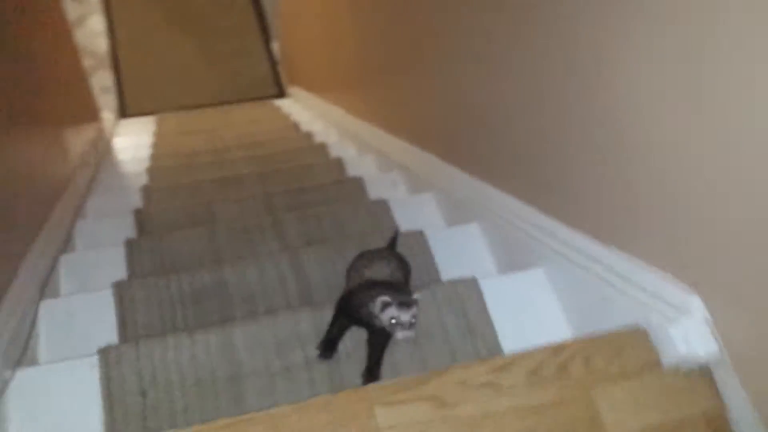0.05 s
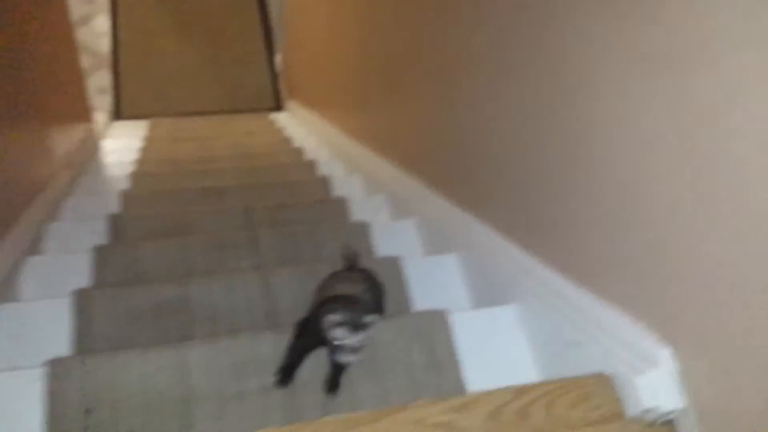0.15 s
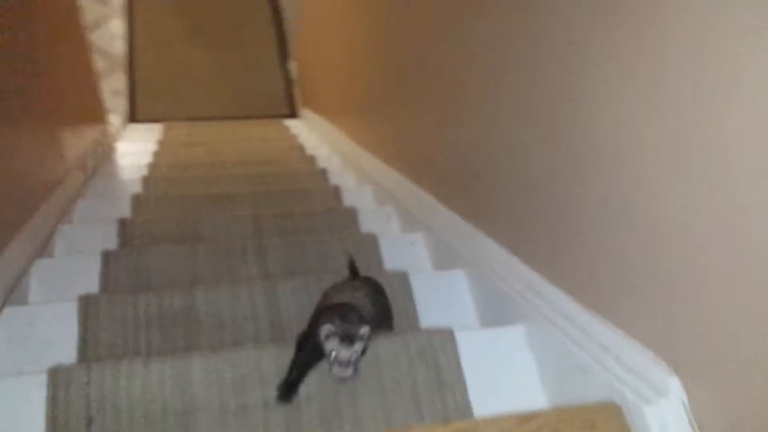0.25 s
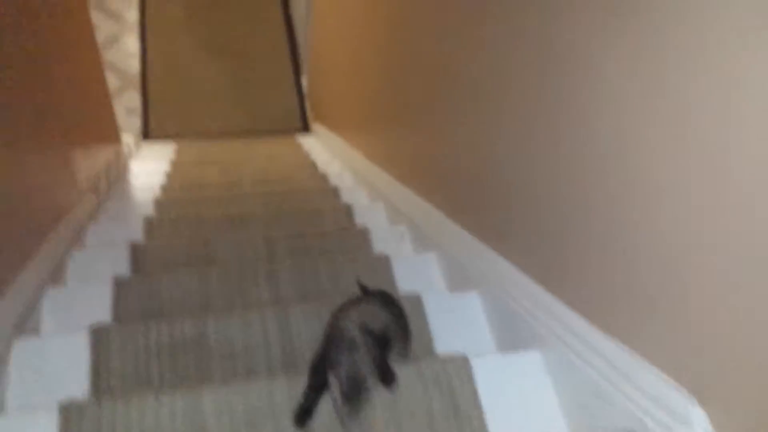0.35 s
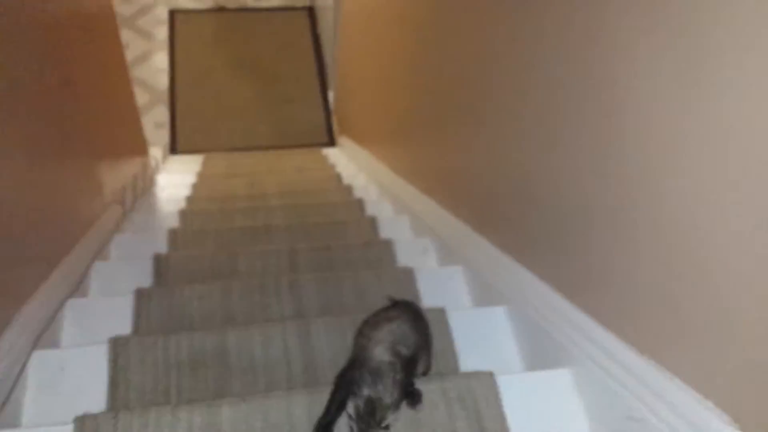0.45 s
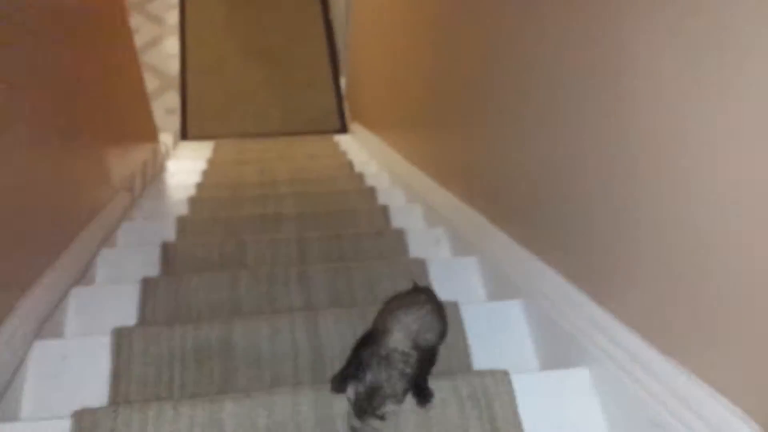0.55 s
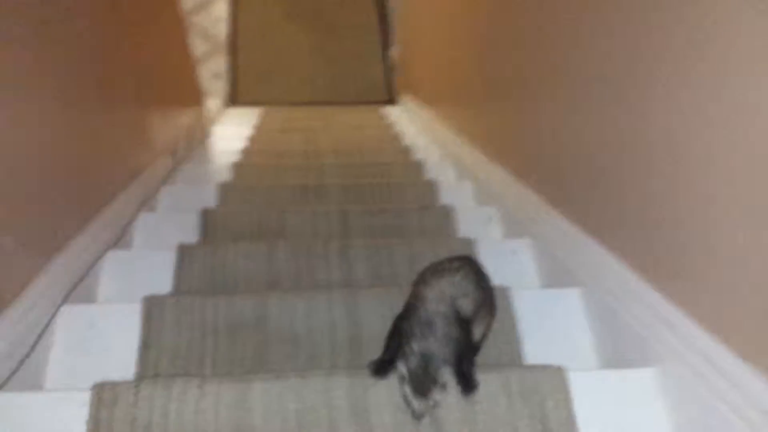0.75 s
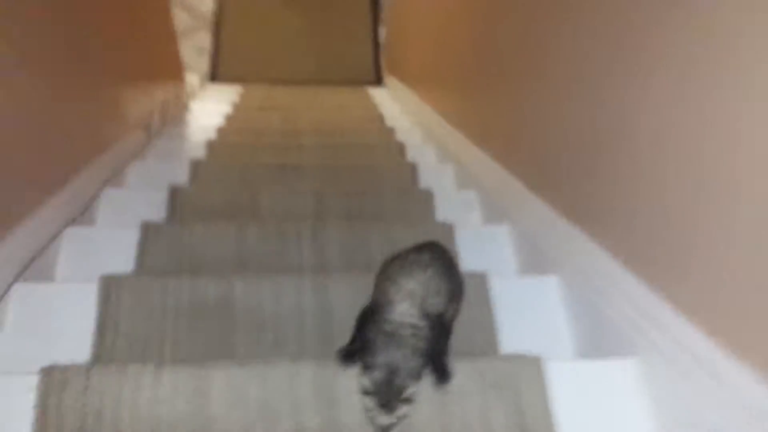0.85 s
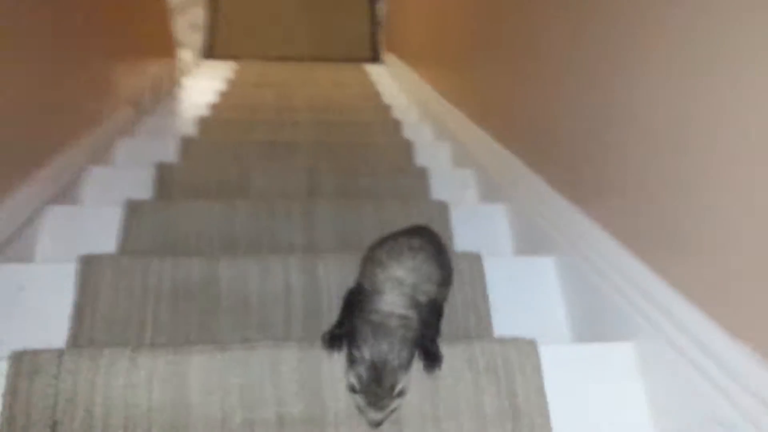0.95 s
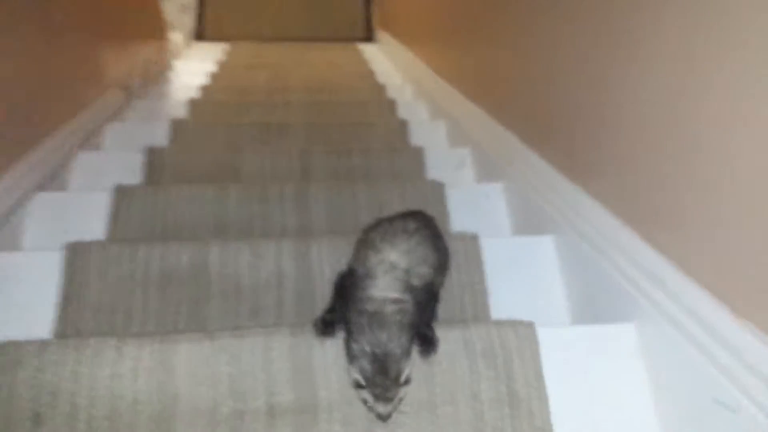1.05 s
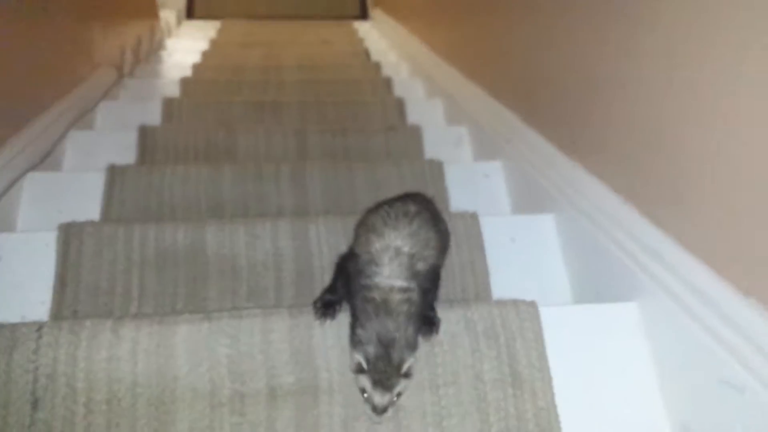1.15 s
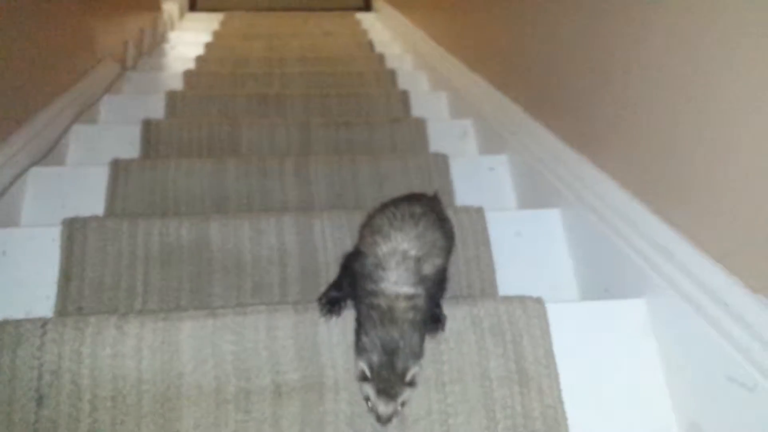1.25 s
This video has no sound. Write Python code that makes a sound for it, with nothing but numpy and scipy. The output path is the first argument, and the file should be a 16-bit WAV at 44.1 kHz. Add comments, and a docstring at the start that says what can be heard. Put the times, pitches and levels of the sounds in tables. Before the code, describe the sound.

A ferret's paws thump and scuff on carpeted stairs, with small claw ticks and brushing fur. Two hard wooden knocks sound in the stairwell, followed by close finger bumps on the left of the hand-held microphone, over faint hiss.

```python
"""A hard knock rings in a stairwell, then a ferret hops up the carpeted wooden stairs towards a
hand-held camera. Its paws thump the treads and scuff the carpet; claws tick and fur brushes the pile.
A second knock midway also sets the staircase ringing, and fingers bump the camera's left side.
The right microphone hears most of the treble, over a low room rumble and faint hiss."""
import sys
import numpy as np
from scipy import signal
from scipy.fft import rfft, irfft, next_fast_len
from scipy.io import wavfile

SR = 44100
rng = np.random.default_rng(int(sys.argv[2]) if len(sys.argv) > 2 else 0)


def waveform_to_disk(signal):
    """Save audio, clipped to [-1, 1], as 16-bit WAV at the path in sys.argv[1]."""
    frames = np.transpose(np.atleast_2d(signal))
    scaled = np.clip(frames, -1, 1) * 32767
    samples = np.round(scaled).astype(np.int16)
    wavfile.write(sys.argv[1], SR, samples)


N = 57330

# Spectra of the sources: f/Hz, relative level/dB per Hz
RUMBLE_SPECTRUM = [(20, -7.5), (55, 2), (120, -3.5), (230, -16.5), (500, -24.5), (1500, -34.5),
                   (4000, -39.5), (14000, -53)]  # room and handling
HISS_SPECTRUM = [(200, 12.5), (1500, 4.5), (4000, -2.5), (9000, -0.5), (12000, -2), (14500, -6)]  # microphone noise
BUMP_SPECTRUM = [(40, 0), (350, 5), (800, -8), (2000, -20), (5000, -51), (14000, -45)]  # finger on the case
CLACK_SPECTRUM = [(60, -10), (250, 6), (550, 6.5), (900, 1.5), (1250, 8), (1800, -10), (3000, -14),
                  (6000, -25), (14000, -67)]  # blow on wood
SHUDDER_SPECTRUM = [(40, -7), (130, 0.5), (230, 0), (400, 4.5), (700, -8), (1200, -4), (2000, -13.5),
                    (4000, -25), (14000, -56)]  # the wood after the blow
BRUSH_SPECTRUM = [(80, 6), (300, 13), (800, 9), (1500, 0), (3000, -2), (5000, -3.5), (8000, -4),
                  (11000, -6.5), (14500, -18)]  # fur on carpet
TICK_SPECTRUM = [(500, -5), (2500, -13), (3700, 0), (4700, 7.5), (6000, 0.5), (7700, 3), (9500, -11),
                 (12500, -1.5), (14500, -12)]  # claw tip
PAT_SPECTRUM = [(60, -19), (200, 3), (380, -2), (650, -3), (930, -1.5), (1250, -18), (1600, -12),
                (2000, -23.5), (6000, -38), (14000, -47)]  # board under the carpet
SCUFF_SPECTRUM = [(60, -13), (250, -4), (600, -3.5), (1300, -1), (2300, -1.5), (3000, 3), (3700, 0.5),
                  (5000, -1), (6200, -3), (8000, -1), (11000, -5.5), (12500, -14), (14500, -24)]  # paw in the pile
SCRATCH_SPECTRUM = [(300, -44), (1800, -11), (2450, -8), (2700, -4.5), (2980, 3), (3400, -9), (3900, -12.5),
                    (4500, -11.5), (7000, -23), (14000, -55)]  # claws in the weave
# Course of the background: t/s, level/dB
RUMBLE_LEVELS = [(.02, -38), (.12, -56), (.4, -42), (.62, -55), (.8, -49.5), (.98, -61), (1.1, -48.5),
                 (1.3, -63.5)]
HISS_LEVELS = [(0, -57.5), (.45, -58.5), (.6, -59.5), (.92, -57.5), (.98, -62), (1.08, -61), (1.3, -65)]
# Finger bumps, claw ticks and thin metallic rings: t/s, level/dB
FINGER_BUMPS = [(.308, -23), (.929, -9.5), (1.030, -13.5)]
CLAW_TICKS = [(.379, -34.5), (.4535, -29), (.4895, -30), (.5415, -29.5), (.691, -33), (1.012, -42),
              (1.019, -28), (1.227, -42.5), (1.283, -43)]
CLAW_PINGS = [(1.019, -42), (1.283, -54.5)]
# Knocks in the stairwell: t/s, clack/dB, shudder/dB
WOOD_KNOCKS = [(.018, -8, -35), (0.7613, -7.5, -35)]
# Body brushing the carpet: centre t/s, length/s, level/dB
FUR_BRUSHES = [(0.0, 0.091, -41.5), (0.166, 0.031, -43.5), (0.238, 0.097, -46), (0.386, 0.096, -49.5),
               (0.479, 0.022, -44), (0.66, 0.14, -50), (0.798, 0.077, -47.5), (0.901, 0.049, -52),
               (.99, 0.043, -60), (1.09, 0.034, -52), (1.223, 0.17, -63)]
# Tread thumps: paw landings, plus the staircase ringing from the second knock (the 0.761 s row):
# t/s, thump/dB, tread f/Hz, swell/s, ring/dB, pat/dB, scuff/dB, scuff t60/s, scratch/dB
TREAD_THUMPS = [(0.1733, -12.5, 95.2, 0.013, -18.5, -31, -32, 0.2, -31),
                (0.245, -29.5, 96, 0.008, -26, -46, -44.5, 0.17, -59),
                (0.339, -54, 99, 0.0062, -45, -38, -46, 0.06, -68),
                (0.352, -23, 100.4, 0.018, -24.5, -57, -42.5, .25, -51),
                (0.386, -37, 90.5, 0.011, -28, -76, -55, 0.12, -63),
                (0.41, -23.5, 79, 0.0163, -41, -41, -53, 0.29, -59),
                (0.452, -31, 104.8, 0.021, -26, -66, -43.5, 0.26, -41.5),
                (0.691, -25, 115.5, 0.015, -17.5, -35.5, -36, 0.14, -29.5),
                (0.761, -35, 90.5, 0.015, -24.5, -63, -60, .1, -68),
                (.879, -41, 107.6, 0.016, -50, -77, -42, 0.088, -64),
                (1.011, -29.5, 75.8, 0.015, -25, -59, -38.5, 0.14, -43),
                (1.061, -35.5, 83.2, 0.017, -28.5, -45, -52, 0.051, -67)]
# Resonances of the staircase: f/Hz, relative level/dB, t60/s
STAIR_RESONANCES = [(69.4, -15.5, 0.47), (83.76, -14.5, 0.26), (126.1, -10.5, 0.21), (170, -17, 0.16),
                    (194.6, -21.5, 0.42), (228.3, -22, 0.41), (264, -18, 0.16), (352, -25, 0.58),
                    (528.6, -21, 0.17)]
# Reverberation of the stairwell: f/Hz, t60/s
STAIRWELL_DECAY = [(100, 0.13), (400, 0.51), (1500, 0.32), (5000, 0.33), (12000, 0.37)]
# Left microphone against the right: f/Hz, level/dB
LEFT_MIC_RESPONSE = [(100, 0.5), (250, -0.5), (500, -5), (1200, -12), (3000, -14.5), (5000, -39),
                     (8000, -45), (14000, -10)]


def amp(db):
    """Decibels to gain."""
    return 10 ** (np.asarray(db) / 20)


def unit(x):
    """Scaled to rms 1."""
    return x / np.sqrt(np.mean(x ** 2) + 1e-20)


def along(points, hz):
    """Interpolate (f/Hz, value) points on a log frequency axis."""
    freqs, values = np.transpose(points)
    return np.interp(np.log(hz + 1), np.log(freqs + 1), values)


def since(s):
    """Seconds since a moment, zero before it."""
    return np.maximum(np.arange(N) / SR - s, 0)


def level(points):
    """Gain per sample from (t/s, level/dB) points."""
    return amp(np.interp(since(0), *np.transpose(points)))


def strike(s, attack_s, t60_s):
    """An envelope that rises quickly and dies away."""
    return (1 - np.exp(-since(s) / attack_s)) * amp(-60 * since(s) / t60_s)


def clicks(rows):
    """One sharp push for each (t/s, level/dB) row."""
    out = np.zeros(N)
    for s, db in rows:
        out[int(s * SR)] += amp(db)
    return out


def colour(x, points, keep_power=True):
    """Minimum-phase filter shaped by (f/Hz, level/dB); keep_power holds white noise at its power."""
    size = next_fast_len(2 * N)
    gain = amp(along(points, np.fft.rfftfreq(size, 1 / SR)))
    cepstrum = irfft(np.log(unit(gain) if keep_power else gain), size)
    cepstrum[1:size // 2] *= 2
    cepstrum[size // 2 + 1:] = 0
    return irfft(rfft(x, size) * np.exp(rfft(cepstrum)), size)[..., :N]


def grainy(depth_db):
    """Noise whose strength jumps each millisecond, as fibres catch and slip."""
    knots = rng.standard_normal(N // 44 + 2)
    flicker = np.interp(np.linspace(0, len(knots) - 1, N), np.arange(len(knots)), knots)
    return unit(rng.standard_normal(N) * amp(depth_db * flicker))


def stairwell(x, wet_db):
    """Direct sound plus a diffuse tail at each microphone."""
    hz, t, noise = signal.stft(rng.standard_normal((2, SR // 2)), SR, nperseg=256)
    decay = amp(-60 * t / along(STAIRWELL_DECAY, hz)[:, None])
    tail = signal.istft(noise * decay, SR, nperseg=256)[1]
    tail = np.pad(tail, ((0, 0), (150, 0)))  # 3.4 ms behind the direct sound
    tail /= np.linalg.norm(tail[0])
    return x + amp(wet_db) * signal.fftconvolve(x[None], tail, axes=1)[:, :N]


def room_tone(side_db=-8.5):
    """Room and handling rumble that settles as the camera steadies, and microphone hiss."""
    mid, side = colour(rng.standard_normal((2, N)), RUMBLE_SPECTRUM)
    side *= amp(side_db)
    rumble = level(RUMBLE_LEVELS) * np.array([mid + side, mid - side])
    hiss = level(HISS_LEVELS) * colour(rng.standard_normal((2, N)), HISS_SPECTRUM)
    return rumble + hiss


def finger_bumps(right_db=-29):
    """Fingers on the camera's left side, heard close and dry through the case."""
    return colour(clicks(FINGER_BUMPS), BUMP_SPECTRUM) * amp([[0], [right_db]])


def knocks(rebound_s=0.00118, rebound_db=-1):
    """Out in the stairwell, a clack with an instant rebound, then the struck wood's duller shudder."""
    blows = sum(clicks([(s, db), (s + rebound_s, db + rebound_db)]) for s, db, _ in WOOD_KNOCKS)
    clack = colour(blows, CLACK_SPECTRUM)
    envelope = sum(amp(db) * strike(s, attack_s=0.0018, t60_s=0.16) for s, _, db in WOOD_KNOCKS)
    shudder = colour(envelope * grainy(depth_db=4), SHUDDER_SPECTRUM)
    return stairwell(clack + shudder, wet_db=-3)


def fur_brushes():
    """Belly and tail drag softly over the carpet between hops."""
    envelope = sum(amp(db) * np.exp(-2 * ((since(0) - s) / length) ** 2) for s, length, db in FUR_BRUSHES)
    return stairwell(colour(envelope * grainy(depth_db=1), BRUSH_SPECTRUM), wet_db=0.5)


def claw_ticks(ping_hz=8020, flutter_hz=60.6):
    """Claws tick sharply on the stairs, twice with a thin fluttering ring."""
    ticks = np.zeros(N)
    for s, db in CLAW_TICKS:
        envelope = strike(s, attack_s=0.00009, t60_s=0.007)
        burst = envelope * rng.standard_normal(N)
        ticks += amp(db) * burst * np.linalg.norm(envelope) / np.linalg.norm(burst)
    drift = np.cumsum(rng.standard_normal(N)) * np.sqrt(2 * np.pi * flutter_hz / SR)
    pings = np.zeros(N)
    for s, db in CLAW_PINGS:
        tone = np.sin(2 * np.pi * ping_hz * since(s) + drift)
        pings += amp(db) * strike(s, attack_s=0.0012, t60_s=0.2) * tone
    return stairwell(colour(ticks, TICK_SPECTRUM) + pings, wet_db=-5)


def paw_scuffs(attack_s=0.0025, grain_db=2.5):
    """Pads pat the board and bite into the pile while claws rake the weave."""
    pat, scuff, scratch = np.zeros((3, N))
    for s, *_, pat_db, scuff_db, scuff_t60_s, scratch_db in TREAD_THUMPS:
        pat += amp(pat_db) * strike(s, attack_s, t60_s=0.13)
        scuff += amp(scuff_db) * strike(s, attack_s, scuff_t60_s)
        scratch += amp(scratch_db) * strike(s, attack_s, t60_s=0.1)
    pat = colour(pat * grainy(grain_db), PAT_SPECTRUM)
    scuff = colour(scuff * grainy(grain_db), SCUFF_SPECTRUM)
    scratch = colour(scratch * grainy(grain_db), SCRATCH_SPECTRUM)
    return stairwell(pat + scuff, wet_db=-1) + stairwell(scratch, wet_db=-7)


def tread_thumps(overtone_ratio=1.47, overtone_db=-13):
    """A paw or the second knock gives a tread a few deep swings and leaves the staircase ringing."""
    out = np.zeros(N)
    for s, thump_db, tread_hz, swell_s, ring_db, *_ in TREAD_THUMPS:
        age = since(s) / swell_s
        swell = (age * np.exp(1 - age)) ** 2
        phase = 2 * np.pi * tread_hz * since(s)
        bending = np.sin(phase) + amp(overtone_db) * np.sin(overtone_ratio * phase)  # two modes
        out -= amp(thump_db) * swell * bending
        for mode_hz, mode_db, t60_s in STAIR_RESONANCES:
            swing = np.sin(2 * np.pi * (mode_hz * since(s) + rng.random()))
            out += amp(ring_db + mode_db) * strike(s, attack_s=0.004, t60_s=t60_s) * swing
    return out


def scene(left_lag_s=55e-6):
    """Sound from the stairs reaches the left microphone muffled and slightly late."""
    left, right = tread_thumps() + paw_scuffs() + fur_brushes() + claw_ticks() + knocks()
    muffled = colour(left, LEFT_MIC_RESPONSE, keep_power=False)
    left = np.interp(since(0) - left_lag_s, since(0), muffled)
    return np.array([left, right]) + finger_bumps() + room_tone()


def record(dry):
    """The camera keeps nothing above its band limit."""
    size, top_hz = next_fast_len(2 * N), 14750
    passband = np.fft.rfftfreq(size, 1 / SR) < top_hz
    return irfft(rfft(dry, size) * passband, size)[:, :N]


dry = scene()
out = record(dry)
waveform_to_disk(out)
```